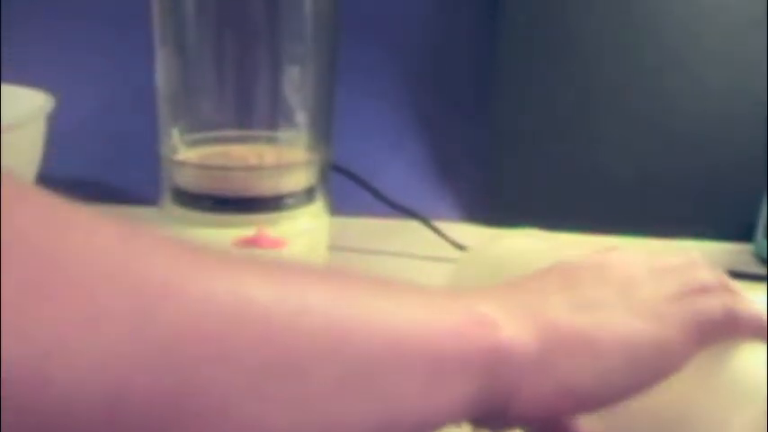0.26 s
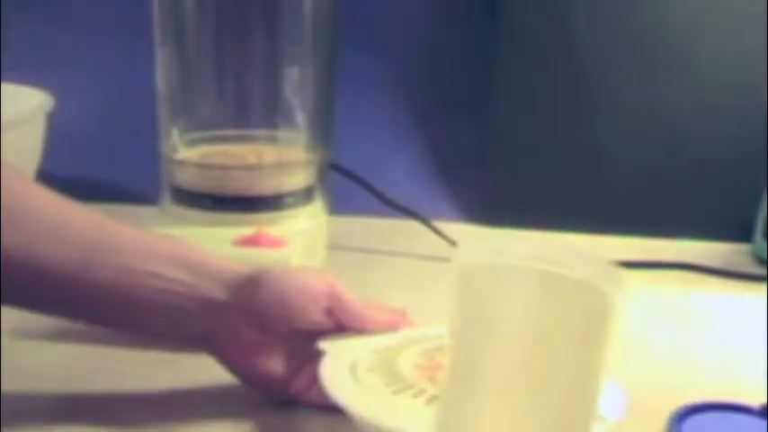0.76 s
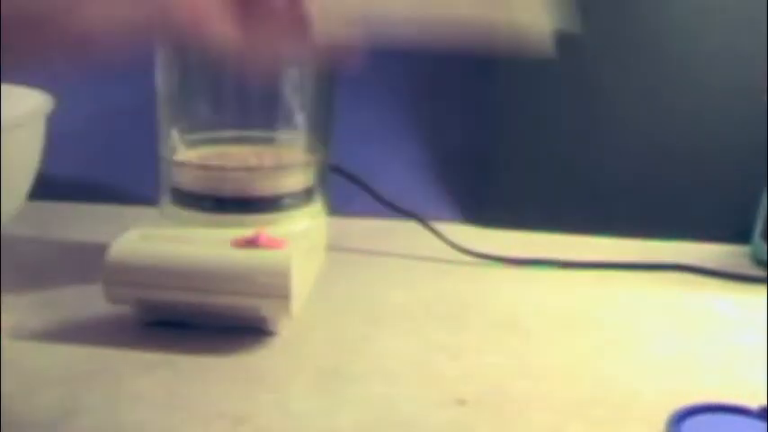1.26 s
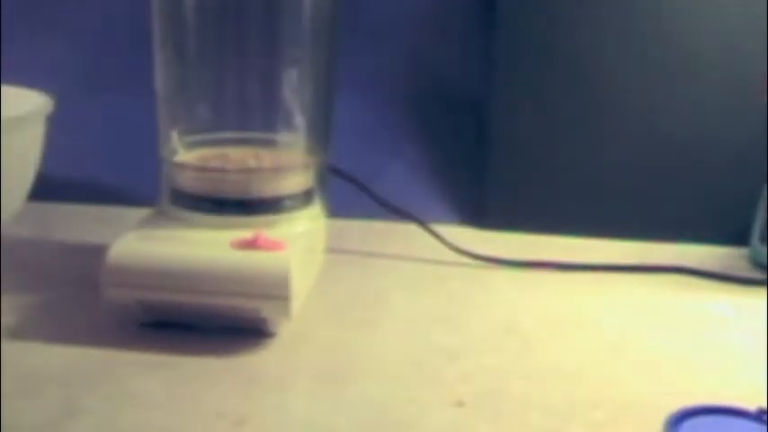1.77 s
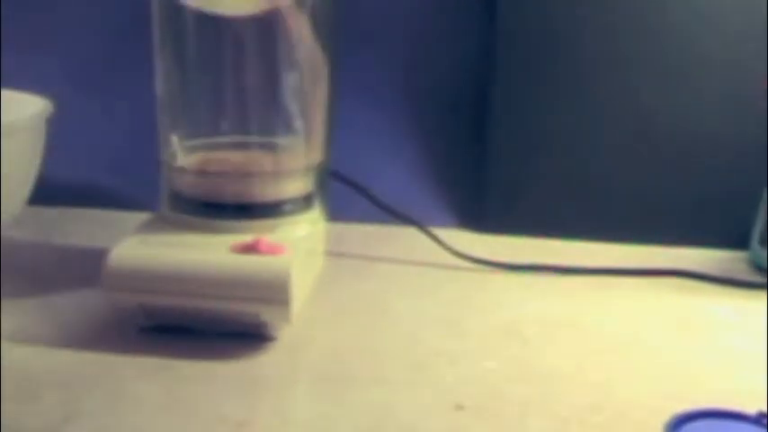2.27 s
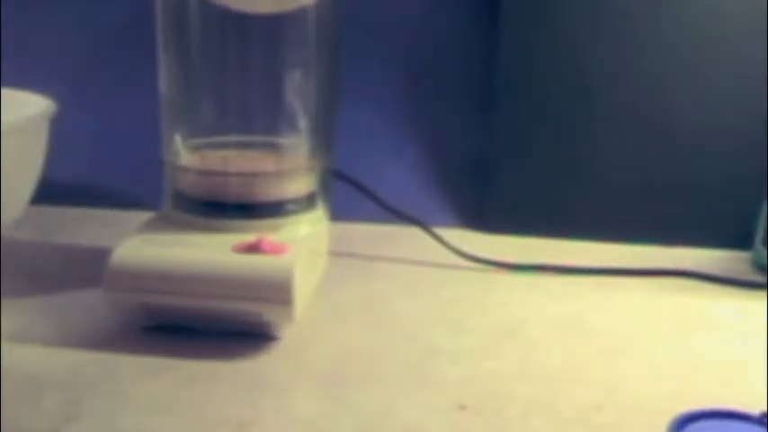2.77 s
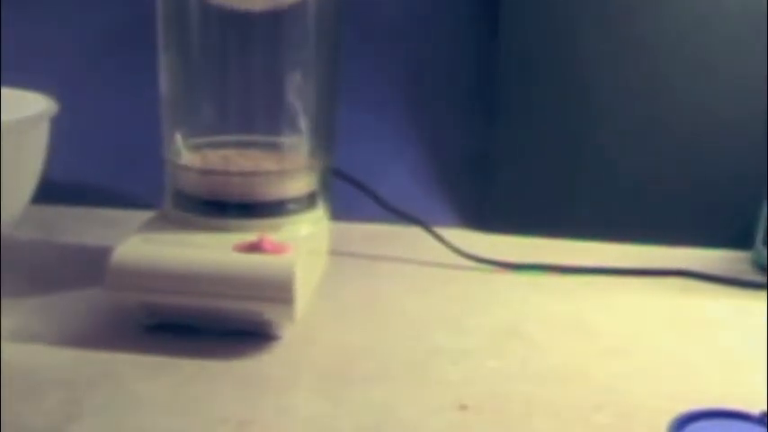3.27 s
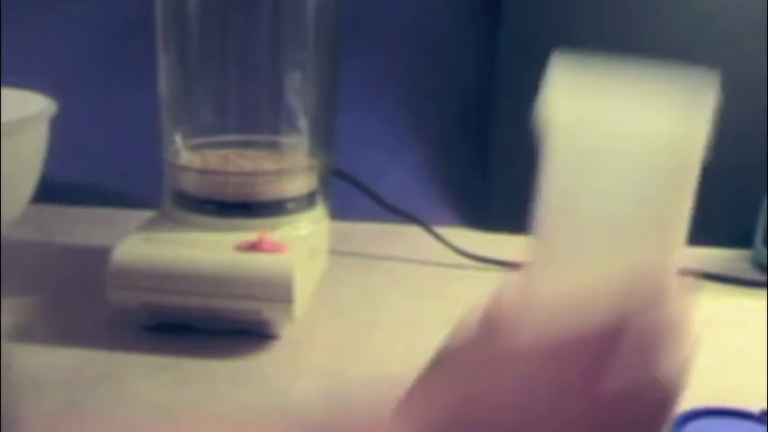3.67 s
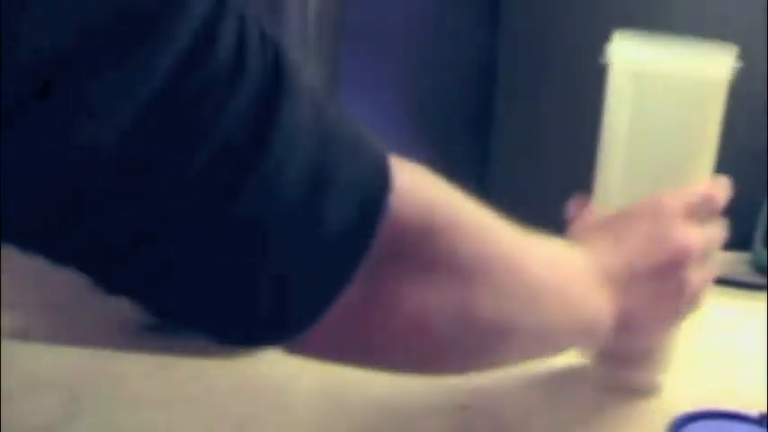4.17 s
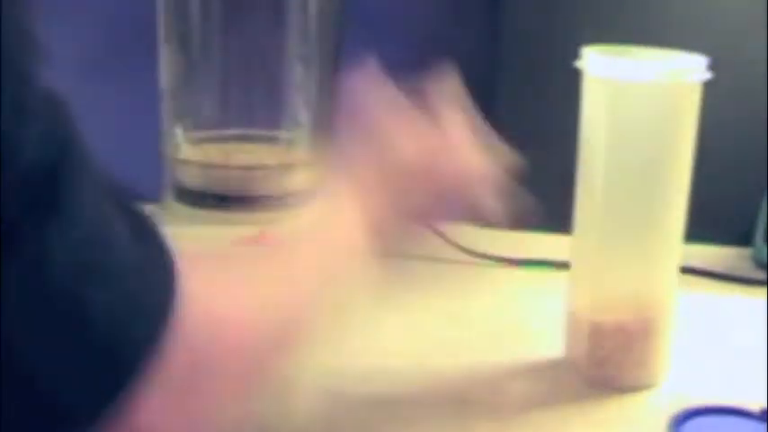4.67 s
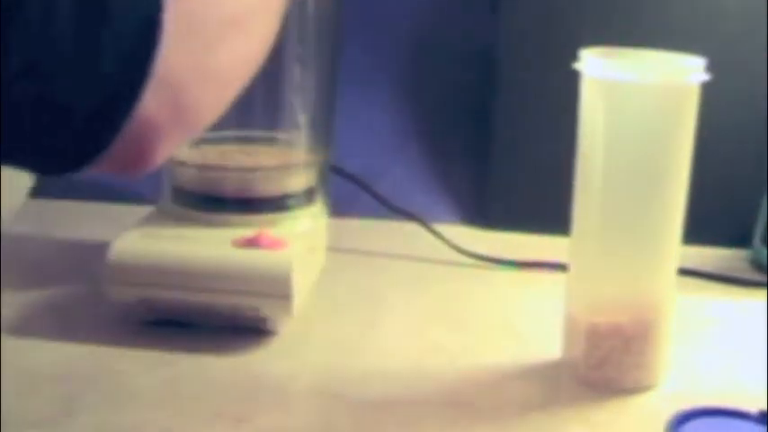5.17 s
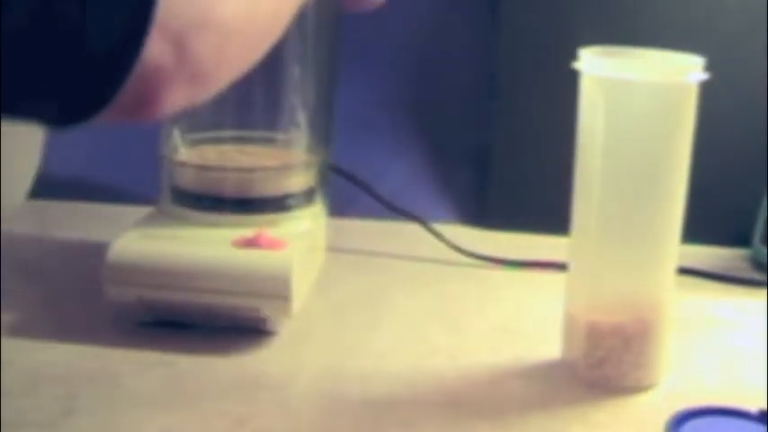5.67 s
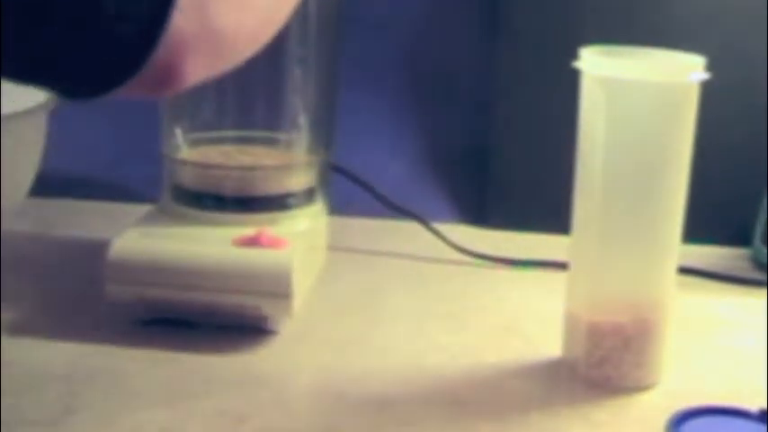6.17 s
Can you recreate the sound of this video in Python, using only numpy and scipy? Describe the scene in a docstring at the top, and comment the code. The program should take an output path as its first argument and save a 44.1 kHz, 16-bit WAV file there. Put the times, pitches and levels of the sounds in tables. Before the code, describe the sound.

Popcorn kernels rattle and stream into a blender jar in a small humming kitchen, followed by a hollow container thump and plastic lid clacks.

```python
"""Dry kernels, each impact a brief random-pitched grain, are tipped from a tall plastic canister into a cup
and poured into the ringing jar of an idle blender. The canister, a sum of struck modes and noise, is knocked
upright and set down on the worktop; then fingers scuff as the blender's lid is pressed on, with modal knocks.
Sine lines and filtered noise make a mains appliance hum in the small kitchen; a dull microphone is close by."""
import sys
import numpy as np
from scipy import signal
from scipy.fft import rfft, irfft
from scipy.io import wavfile

SR = 44100
rng = np.random.default_rng(int(sys.argv[2]) if len(sys.argv) > 2 else 0)


def generate_wav(sig):
    """Save sig (samples, or channels by samples) to the path in sys.argv[1] as 16-bit PCM at SR."""
    pcm = np.round(np.clip(np.atleast_2d(sig).T, -1, 1) * 32767).astype(np.int16)
    wavfile.write(sys.argv[1], SR, pcm)


N = 283117
T = np.arange(N) / SR  # time axis, s

# Levels and gains in the tables are relative: the functions add the balance of the layers.

# Surges of kernels, columns: start_s, attack_s, hold_s, release_s, level_db, sag_db (negative: swells)
# kernels trickling out of the canister
TRICKLE_SURGES = [(0, 0.0018, .39, .18, -39.5, 4)]
# the whole mass sliding out in a rush
RUSH_SURGES = [(.37, .38, .07, .175, -26, 2)]
# the sliding mass drumming on the canister wall
SLIDE_SURGES = [(.4, .135, .275, .14, -38.5, -5.5)]
# kernels shifting in the cup as it is lifted, swung over and tilted
SHIFT_SURGES = [(1, 0.067, .02, 0.14, -67, -1.5), (1.41, 0.078, .24, .4, -63.5, 12.5),
                (1.84, 0.056, .145, 0.045, -45, -5)]
# the first few kernels falling into the jar, then the stream
POUR_SURGES = [(2.042, .026, .004, .07, -24, 6.5), (2.02, .09, .46, .36, -21, 6.5)]
# weight of the stream drumming on the floor of the jar
DRUM_SURGES = [(2.04, .12, .44, .6, -37.5, 4)]
# kernels slithering, then dropping back down the canister
SETTLE_SURGES = [(3.46, .14, .42, .09, -52.5, 1), (3.63, 0.015, 0.16, 0.12, -31, -1.5)]
# the stream waking the main note of the jar's wall: as above, with gain_db for level_db
WALL_NOTE_SURGES = [(2.03, 0.14, 0.49, 0.36, -1, -4.5), (2.26, 0.11, 0.018, 0.081, 2, 10)]

# Spectral colour of each flow, columns: frequency_hz, gain_db
TRICKLE_SPECTRUM = [(400, -34.5), (750, -20), (1050, -7), (1350, -6.5), (1800, -0.5), (2600, -2.5),
                    (3700, -0.5), (5000, -8), (6200, -13.5), (7600, -36)]
RUSH_SPECTRUM = [(200, -49), (390, 0.5), (500, -14.5), (690, -5), (850, -11.5), (1070, 0.5), (1700, -11.5),
                 (2050, 0), (2400, 2.5), (3300, 0.5), (4200, -0.5), (5800, -11), (6800, -18), (7600, -40.5)]
SLIDE_SPECTRUM = [(500, -35), (850, -18.5), (1070, 3), (1220, -14), (1350, -3), (1500, -3.5), (1700, -1),
                  (2050, -13), (3500, -42.5)]
POUR_SPECTRUM = [(400, -39), (800, -27.5), (1200, -16), (1650, -6), (2100, -2), (2450, -6), (3000, -2),
                 (4500, -7), (6200, -17), (7600, -38)]
DRUM_SPECTRUM = [(120, -28), (270, -11), (325, -12), (385, 2), (500, -13.5), (670, -3), (800, -12.5),
                 (1150, 0), (1800, -14), (4000, -57.5)]
SETTLE_SPECTRUM = [(240, -41), (400, -4), (730, -19), (1150, 1), (1800, -2.5), (2300, 1.5), (3000, -0.5),
                   (4250, -0.5), (6200, -13), (7600, -35.5)]
# resonances of the jar under the falling kernels: frequency_hz, width_hz, gain_db
JAR_RESONANCES = [(1330, 64, 4.5), (2280, 57, -1), (2640, 110, -4), (2770, 40, 3.5), (2996, 28, 5),
                  (3070, 55, -1.5), (3720, 220, -6)]
# lone kernels that strike harder: start_s, peak_db
LONE_KERNELS = [(.2515, -37), (0.3948, -29), (0.545, -21.5), (0.6148, -24), (.633, -22.5), (1.051, -42),
                (1.46, -49), (1.724, -48.5), (2.065, -22), (2.563, -14), (2.64, -19), (2.741, -22.5),
                (2.9572, -45.5), (3.6139, -22.5), (3.9888, -34), (4.0183, -36.5), (4.202, -48)]

# the mass of kernels slumping onto the canister's floor: start_s, level_db
SLUMP_BLOWS = [(3.662, -26.5), (3.692, -28)]
# the canister knocked upright: start_s, level_db, hardness_db
UPRIGHT_BLOWS = [(3.6456, -13, 8.5), (3.6508, -23, -1.5)]
# the canister landing on the worktop and rocking to rest: start_s, level_db, hardness_db
LANDING_BLOWS = [(4.2495, -10, 3), (4.2545, -7.5, -5.5), (4.316, -38, -8), (4.3593, -27, -7.5)]
# cup and lid knocking on the jar: start_s, level_db, hardness_db, worktop_push_db
JAR_KNOCKS = [(1.895, -30, -4, -5), (2.8, -28.5, -3, -14), (3.037, -26.5, -5, -5.5), (3.092, -30.5, -5, -6),
              (3.177, -29, -5, -9), (3.586, -35, -4, -18), (5.446, -28.5, -3, -13), (5.472, -36.5, -1, -1),
              (5.493, -38, -1.5, -7), (5.532, -27.5, 13, -3), (5.543, -34.5, 9, 4.5), (5.567, -26, 1.5, -8),
              (5.635, -22, -1, -19), (5.664, -23.5, -3, -13), (5.688, -36.5, -4, -10.5),
              (5.883, -23.5, 2, -4), (5.924, -33.5, 6.5, 1), (5.959, -32.5, -5, -9), (5.983, -32, -31, -10),
              (6.099, -38.5, -15, -1.5), (6.204, -39, 3.5, -11), (6.3, -44, 7, -8),
              (6.343, -38.5, 0.5, -20)]

# Modes of struck bodies, columns: frequency_hz, level_db, t60_s (before any extra damping)
# floor of the canister
CANISTER_FLOOR_MODES = [(221, -2, 0.11), (287, -3.5, 0.08), (558, -5, 0.083), (737, -5.5, 0.077)]
# wall of the canister
CANISTER_WALL_MODES = [(224, -15, 0.17), (305, -13.5, 0.28), (470, -2, 0.16), (601, -3, 0.11),
                       (698, -5, .13), (795, -8.5, 0.11), (907, -14, 0.11), (1037, 10.5, 0.036),
                       (1380, -13, 0.041), (1423, -6, 0.036), (1593, -7, 0.02), (2040, 2.5, 0.033),
                       (2230, -7, 0.047), (2670, -10, 0.084)]
# worktop under the landing canister
TABLE_MODES = [(103, -3.5, 0.25), (157, -3, 0.1), (201.3, -16.5, 0.5), (273, -2, 0.33), (326, -11, 0.24),
               (409, 2.5, 0.11), (510, -4, 0.069), (543, -4.5, 0.15), (648, -3.5, 0.059),
               (730, -9.5, 0.065), (785, -21, 0.068), (986, -4.5, 0.092), (1067, -19, 0.13),
               (1220, -15, 0.13), (1480, -29, 0.12), (1560, -12.5, 0.1), (1880, -26, 0.11),
               (2140, -19.5, 0.15), (2337, -20.5, 0.19)]
# jar on its base
JAR_BODY_MODES = [(208.5, -13.5, 0.083), (276.7, -9, 0.41), (320.7, -7.5, 0.24), (370, 4, 0.13),
                  (399.7, 4.5, 0.089), (451, 1, 0.066), (559.4, -3.5, 0.1), (619, -6.5, 0.095)]
# plastic rim and lid
RIM_AND_LID_MODES = [(920, 2.5, 0.16), (1150, -10.5, 0.058), (1374, -18, 0.2), (1663, -2, 0.11),
                     (1780, -3, .11), (2100, 10, 0.073), (2310, -6, 0.15), (2520, -4, 0.13),
                     (2960, -15.5, 0.19), (3320, -9, 0.058), (3330, -1.5, 0.1)]

# Spectral colour of contacts, rubbing and air, columns: frequency_hz, gain_db
# crack of the knocked canister
WALL_SPECTRUM = [(30, -20), (70, -9.5), (350, -1), (700, 2), (1200, 2.5), (1900, -7.5), (2600, -19.5),
                 (3700, -14), (5900, -59), (7600, -48)]
# crack of the landing
WORKTOP_SPECTRUM = [(30, -22), (70, -9), (400, 1), (680, 1.5), (1000, 4.5), (1500, -15.5), (2200, -24),
                    (3700, -26), (6000, -49), (7600, -68)]
# kernels jolted by the landing
RATTLE_SPECTRUM = [(300, -3), (700, 2), (1100, -3.5), (1600, -6.5), (2500, -4), (3700, -5.5), (5000, -16.5),
                   (6200, -27), (7600, -42)]
# parts of a knock on the jar: middle, treble, bass
CLACK_SPECTRUM = [(300, -8.5), (600, 2), (850, -6.5), (1150, -4), (1400, 1.5), (1650, -4), (1900, -4.5),
                  (2200, -3.5), (2450, -8), (2850, -1.5), (3400, -18), (4500, -33), (7500, -55.5)]
SNAP_SPECTRUM = [(1500, -21), (3200, 4.5), (4200, 3), (5000, -7.5), (6200, -15.5), (7500, -37)]
BOOM_SPECTRUM = [(28, -8), (60, -6), (100, 2), (170, -3.5), (225, -0.5), (290, -10.5), (500, -68.5)]
# skin over plastic
SCUFF_SPECTRUM = [(400, -14.5), (730, -11), (1300, 5), (2200, 3), (3200, 3), (4200, -1.5), (5000, -13.5),
                  (6200, -22), (7600, -33)]
# rush of the appliance's fan
AIR_SPECTRUM = [(25, -34), (50, -22.5), (84, -16), (125, -14), (170, -9.5), (210, -15.5), (355, -13),
                (440, -17.5), (620, -18.5), (1170, -24), (1760, -31), (3800, -43.5), (6000, -57),
                (7600, -75)]

# fingers scuffing over the plastic: centre_s, half_length_s (to 1/e), level_db
FINGER_STROKES = [(4.76, .018, -55.5), (4.887, 0.014, -51.5), (4.923, 0.016, -50.5), (5.025, 0.041, -51),
                  (5.076, 0.018, -46), (5.21, 0.064, -56.5), (5.506, .02, -50.5), (5.653, 0.052, -36.5),
                  (5.781, 0.024, -44.5), (6.072, 0.01, -49), (6.357, 0.064, -58)]
# resonances of the rubbed lid: frequency_hz, width_hz, gain_db
LID_RESONANCES = [(1380, 30, 0), (1800, 130, -9), (2470, 63, -8), (2820, 31, -8), (3020, 42, -3),
                  (3430, 25, -13), (4040, 34, -16)]
# hum and motor lines of the appliance: frequency_hz, rms_db
HUM_LINES = [(118.4, -49.5), (156.1, -53.5), (360.7, -71.5), (522.2, -67.5), (629.8, -70.5)]

GRAIN_T60_S = .009  # decay of one kernel's impact
SURGE_DEPTH_DB = 31  # rise during the attack, and fall during the release
# Parts of a knock of hardness 0, before its own level and push: hardness adds fully to the snap
# and by a share to rim and clack.
THUD_DB, RIM_DB, CLACK_DB, SNAP_DB, BOOM_DB = -5, -16.5, -11, -18.5, -3.5
BRIGHT_HARDNESS_SHARE = 0.65
AIR_DB = -51  # rms before its slow flicker
TOP_HZ = 7400  # upper limit of the microphone


def kernels():
    """Granular impact: colliding kernels sum to a rustle, coloured by the vessel that they strike."""
    out = flow(surges(TRICKLE_SURGES), TRICKLE_SPECTRUM, rate=1300, spread_db=-0.5, db=0.0, clump_db=1.8)
    out += flow(surges(RUSH_SURGES), RUSH_SPECTRUM, rate=2200, spread_db=-1.0, db=-0.5, clump_db=2.15)
    out += flow(surges(SLIDE_SURGES), SLIDE_SPECTRUM, rate=830, spread_db=3.0, db=1.0, clump_db=-0.5)
    out += flow(surges(SHIFT_SURGES), TRICKLE_SPECTRUM, rate=1300, spread_db=1.0, db=2.5, clump_db=0.2)
    out += flow(surges(SETTLE_SURGES), SETTLE_SPECTRUM, rate=2200, spread_db=1, db=0.3, clump_db=-1.7)
    out += flow(surges(DRUM_SURGES), DRUM_SPECTRUM, rate=500, spread_db=-1, db=1.5, clump_db=1.0)
    return out + pour() + lone_kernels()


def pour():
    """Forced resonance: the falling stream excites the jar and the main note of its wall."""
    stream = flow(surges(POUR_SURGES), POUR_SPECTRUM, rate=2000, spread_db=-0.3, db=0.5, clump_db=.4)
    jar = resonances(stream, JAR_RESONANCES)
    wall = resonate(stream, hz=1984, width=67) * surges(WALL_NOTE_SURGES)
    return amp(-3.5) * stream + amp(-3.0) * jar + amp(2.5) * wall


def lone_kernels():
    """Single impacts: each harder strike is a short coloured contact."""
    out = np.zeros(N)
    for s, peak_db in LONE_KERNELS:
        tick = colour(contact(0.019, scatter_db=11.5), SETTLE_SPECTRUM)
        add(out, s, amp(peak_db) * tick / np.abs(tick).max())
    return out


def slump():
    """Modal excitation: kernels landing together thump the canister's floor."""
    out = np.zeros(N)
    for s, db in SLUMP_BLOWS:
        add(out, s, amp(db) * ring(CANISTER_FLOOR_MODES, detune=.005, vary_db=1.5))
    return out


def canister():
    """Impact of a hollow body: a knock rings its wall; landing rings the worktop and jolts the kernels."""
    out = np.zeros(N)
    for s, db, hard_db in UPRIGHT_BLOWS:
        wall = ring(CANISTER_WALL_MODES, detune=.002, vary_db=.4)
        crack = unit_attack(colour(contact(.02, scatter_db=-5), WALL_SPECTRUM))
        add(out, s, amp(db) * (amp(-1.5) * wall + amp(hard_db - 5.5) * crack))
    for s, db, hard_db in LANDING_BLOWS:
        crack = unit_attack(colour(contact(0.035, scatter_db=9), WORKTOP_SPECTRUM))
        rattle = unit_attack(colour(contact(0.21, scatter_db=15), RATTLE_SPECTRUM))
        body = ring(TABLE_MODES, damping=1.48, detune=0.0099, vary_db=3.3)
        hard = amp(hard_db) * (amp(-5.5) * crack + amp(-16.5) * rattle)
        add(out, s, amp(db) * (amp(-5.0) * body + hard))
    return out


def blender():
    """Contact hardness: cup or lid thuds on the jar; harder contacts are brighter, pushes boom the worktop."""
    out = np.zeros(N)
    for s, db, hard_db, push_db in JAR_KNOCKS:
        thud = amp(THUD_DB) * ring(JAR_BODY_MODES, damping=1.47, detune=0.043, vary_db=4.0)
        rim = amp(RIM_DB) * ring(RIM_AND_LID_MODES, damping=0.88, detune=0.012, vary_db=7.0)
        clack = amp(CLACK_DB) * unit_attack(colour(chatter(0.13, scatter_db=8.5), CLACK_SPECTRUM))
        snap = amp(SNAP_DB) * unit_attack(colour(chatter(0.08, scatter_db=16), SNAP_SPECTRUM))
        boom = amp(BOOM_DB) * unit_attack(colour(contact(0.46, scatter_db=7.5), BOOM_SPECTRUM))
        bright = amp(BRIGHT_HARDNESS_SHARE * hard_db) * (rim + clack) + amp(hard_db) * snap
        add(out, s, amp(db) * (thud + bright + amp(push_db) * boom))
    return out


def fingers():
    """Friction: swelling and fading strokes of skin wake the lid's resonances; a squeak joins them."""
    strokes = sum(amp(db) * np.exp(-((T - s) / length) ** 2) for s, length, db in FINGER_STROKES)
    audible = strokes * (strokes > 1e-6)
    rub = flow(audible, SCUFF_SPECTRUM, rate=2200, spread_db=0.5, db=-2.0, clump_db=1.0)
    return amp(-3.5) * rub + amp(2.0) * resonances(rub, LID_RESONANCES) + squeak()


def squeak(s=5.095, hz=1400, detune=.012, db=-50, length=.024):
    """Stick-slip: a fingertip on the lid gives a brief note, its pitch drawn once, its level wavering."""
    pitch_hz = hz * (1 + detune * rng.standard_normal())
    slip = np.exp(-((T - s) / length) ** 2)
    return unit(np.sin(2 * np.pi * pitch_hz * T)) * amp(db + 1.8 * wander(120)) * slip


def background(flicker_db=0.57):
    """Steady tones and turbulence: an appliance's hum over the soft, slightly flickering rush of its fan."""
    hum = sum(np.sqrt(2) * amp(db) * np.sin(2 * np.pi * (hz * T + rng.random())) for hz, db in HUM_LINES)
    air = unit(colour(rng.standard_normal(N), AIR_SPECTRUM))
    flicker = np.interp(T, np.linspace(0, T[-1], 30), rng.standard_normal(30))
    return amp(0.5) * hum + air * amp(AIR_DB + flicker_db * flicker)


def flow(gain, points, rate, spread_db, db, clump_db, clumps_per_s=35):
    """Superposition: many small impacts, their level wandering in clumps, sound through one vessel."""
    start, end = T[gain > 0][[0, -1]]
    stream = colour(collisions(start, end, rate, spread_db, GRAIN_T60_S, count=5), points)
    # rms near 1 within the active span rather than over the whole scene
    stream = unit(stream) * np.sqrt((end - start) / T[-1])
    return stream * gain * amp(db + clump_db * wander(clumps_per_s))


def collisions(start, end, rate, spread_db, t60, count):
    """Random impacts: sizes spread exponentially in dB; each rings briefly at count pitches of its own."""
    chance = rng.random((int(rate * (end - start)), count + 2))
    t = T[:SR // 100]
    # positive spread: a few large among many small; negative: a few small among many large
    size = amp(-spread_db * np.log(chance[:, 1] + .012))
    pitch_hz = 8000 * chance[:, 2:, None]
    swing = np.cos(2 * np.pi * pitch_hz * t).sum(axis=1)
    sign = (-1) ** np.arange(len(size))
    grains = (sign * size)[:, None] * swing * np.exp(-np.log(1000) * t / t60)
    first = ((start + (end - start) * chance[:, 0]) * SR).astype(int)
    where = first[:, None] + np.arange(len(t))
    return np.bincount(where.ravel(), grains.ravel(), N)[:N]


def surge(start, attack, hold, release, db, sag_db, fade=0.015):
    """Envelope of one movement: attack, sagging hold and release, each straight in dB."""
    s = start + np.cumsum([0, attack, hold, release])
    level = np.interp(T, s, [-SURGE_DEPTH_DB, 0, -sag_db, -sag_db - SURGE_DEPTH_DB])
    return amp(db + level) * np.interp(T, [s[0] - fade, s[0], s[-1], s[-1] + fade], [0, 1, 1, 0])


def surges(rows):
    """Superposed envelopes of several movements."""
    return sum(surge(*row) for row in rows)


def wander(rate):
    """Random modulation: a new value rate times a second, joined by straight lines."""
    return np.interp(T * rate, np.arange(1024), rng.standard_normal(1024))


def ring(modes, damping=1, detune=0.0075, vary_db=1):
    """Modal decay: damped sines, a little differently tuned and weighted at each blow."""
    t = T[:SR // 2]
    hz, db, t60 = np.transpose(modes)[:, :, None]
    chance = rng.standard_normal((2, len(modes), 1))
    sign = (-1) ** np.arange(len(modes))[:, None]
    swing = np.sin(2 * np.pi * hz * (1 + detune * chance[0]) * t)
    decay = np.exp(-np.log(1000) * damping * t / t60)
    return unit_attack(np.sum(sign * amp(db + vary_db * chance[1]) * swing * decay, axis=0))


def contact(t60, scatter_db):
    """Impulsive force: a sharp push with a brief dying noise of the touching surfaces."""
    noise = burst(t60)
    out = amp(scatter_db) * noise / np.linalg.norm(noise)
    out[0] += 1
    return out


def chatter(t60, scatter_db, bounces_per_s=900):
    """Repeated impact: a sharp push followed by separate tiny bounces that die away."""
    bounces = burst(t60) * (rng.random(SR // 2) < bounces_per_s / SR)
    out = amp(scatter_db) * bounces / (np.linalg.norm(bounces) + 1e-18)
    out[0] += 1
    return out


def burst(t60):
    """Exponential decay: half a second of noise falling 60 dB in t60 seconds."""
    t = T[:SR // 2]
    return rng.standard_normal(len(t)) * 1e-3 ** (t / t60)


def resonate(x, hz, width):
    """Resonance: one band-pass peak, gain 1 at its centre."""
    return signal.lfilter(*signal.iirpeak(hz, hz / width, fs=SR), x)


def resonances(x, rows):
    """Parallel resonances of one body, each with its own gain."""
    return sum(amp(db) * resonate(x, hz, width) for hz, width, db in rows)


def colour(x, points):
    """Minimum-phase filtering: a causal response through (frequency_hz, gain_db) points."""
    hz, db = np.transpose(points)
    grid = np.fft.rfftfreq(8192, 1 / SR)
    cepstrum = irfft(np.log(amp(np.interp(np.log(grid + 1), np.log(hz), db))))
    # folding the cepstrum onto positive time makes the filter causal
    half = len(cepstrum) // 2
    cepstrum[1:half] *= 2
    cepstrum[half + 1:] = 0
    response = irfft(np.exp(rfft(cepstrum)))[:half]
    return signal.fftconvolve(x, response)[:len(x)]


def amp(db):
    """Logarithmic level: decibels to gain."""
    return 10 ** (np.asarray(db) / 20)


def unit(x):
    """Mean power: scale to rms 1."""
    return x / np.sqrt(np.mean(x ** 2) + 1e-18)


def unit_attack(x):
    """Onset power: scale a blow so that its first 20 ms have rms 1."""
    return x / np.sqrt(np.mean(x[:SR // 50] ** 2) + 1e-18)


def add(out, s, x):
    """Superposition: mix x into out from time s on."""
    i = max(int(s * SR), 0)
    out[i:i + len(x)] += x[:N - i]


def kitchen(x, t60, wet_db, early_t60, early_db):
    """Reverberation: dense early reflections and the room's coloured tail, both as dying noise."""
    early = burst(early_t60)
    tail = colour(burst(t60), [(80, -9.0), (300, 6), (1000, 4.5), (3000, -4.0), (7500, -2.0)])
    echo = amp(early_db) * early / np.linalg.norm(early) + amp(wet_db) * tail / np.linalg.norm(tail)
    out = x.copy()
    add(out, .004, signal.fftconvolve(x, echo)[:N])
    return out


def scene():
    """Direct and reflected sound: all on the worktop sounds into the kitchen; the canister is nearest."""
    far = kitchen(kernels() + fingers() + blender(), t60=0.44, wet_db=-13.5, early_t60=0.14, early_db=-8)
    near = kitchen(canister() + slump(), t60=0.38, wet_db=-18, early_t60=0.32, early_db=-17.0)
    return (amp(-1.3) * far + near + background())[None]


def record(dry):
    """Saturation and band limit: the microphone rounds the loudest peaks and passes no high treble."""
    ceiling = .74
    rounded = ceiling * np.tanh(dry / ceiling)
    lowpass = signal.ellip(8, .3, 65, TOP_HZ, fs=SR, output="sos")
    return signal.sosfilt(lowpass, rounded)


dry = scene()
out = record(dry)
generate_wav(out)
```